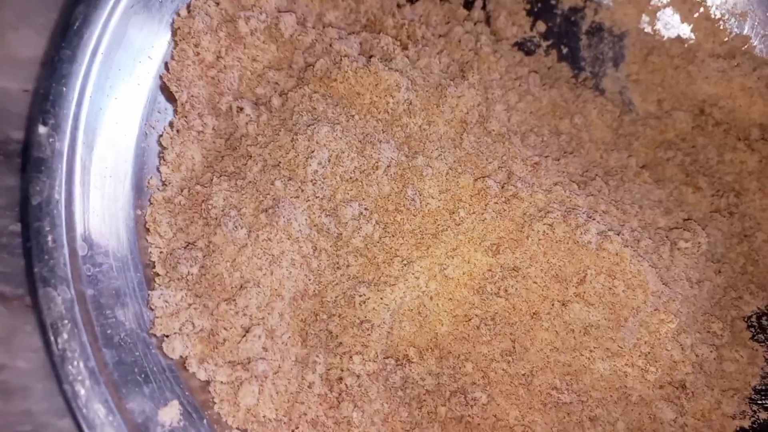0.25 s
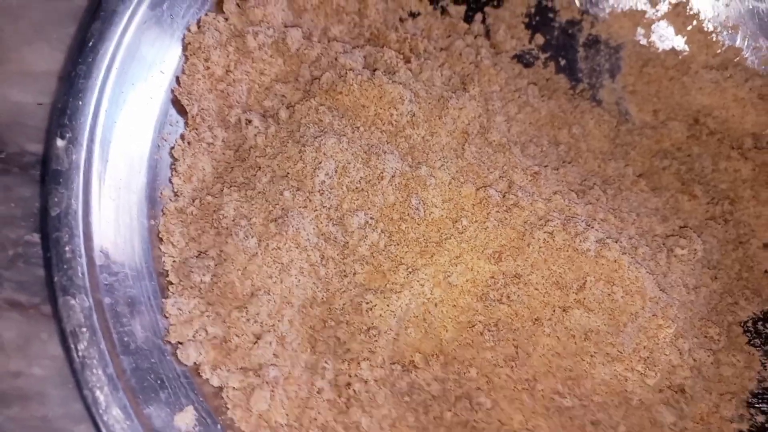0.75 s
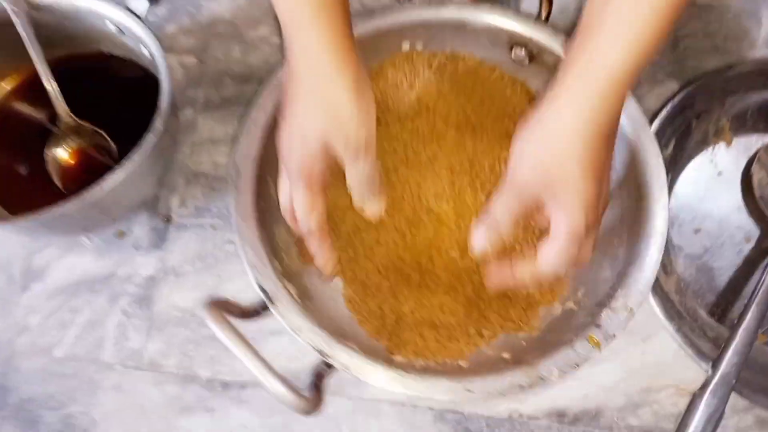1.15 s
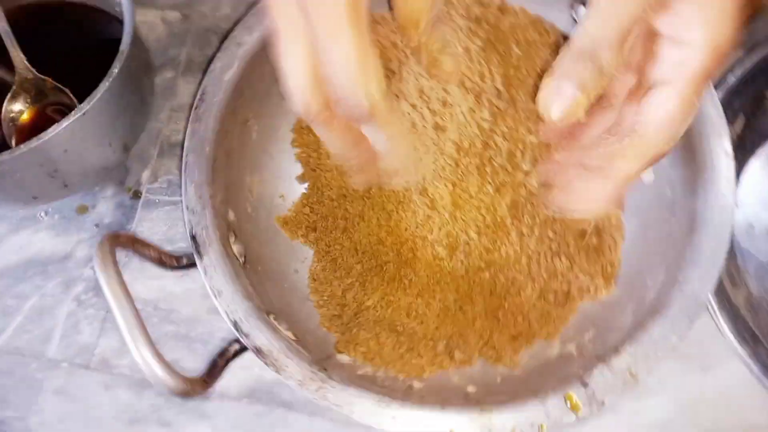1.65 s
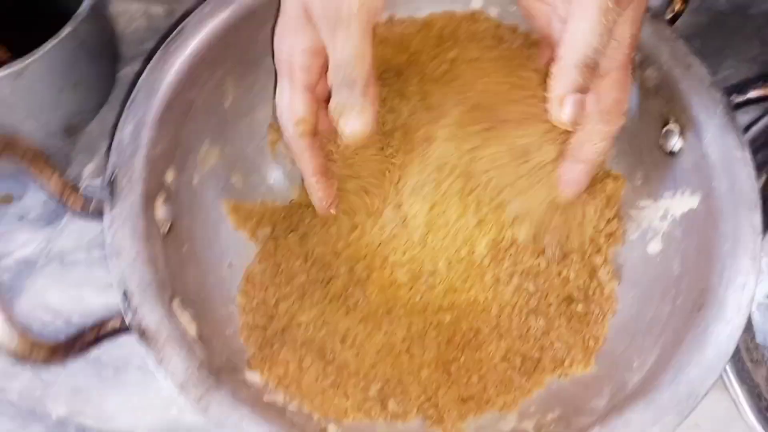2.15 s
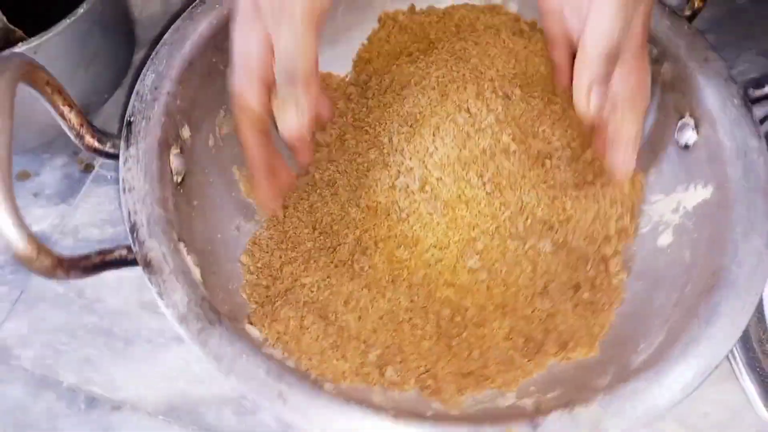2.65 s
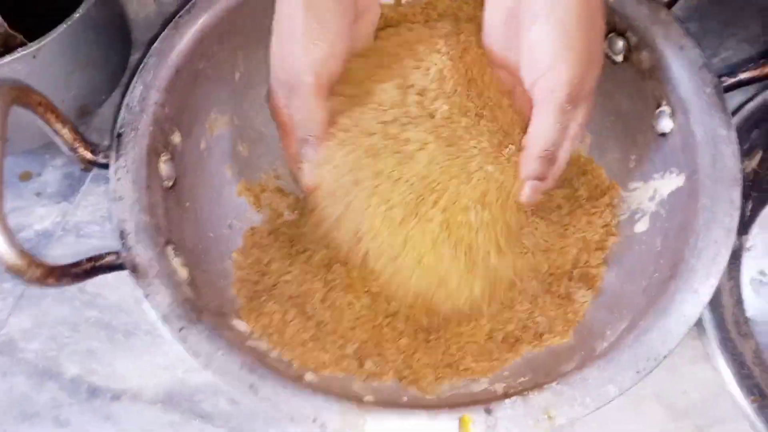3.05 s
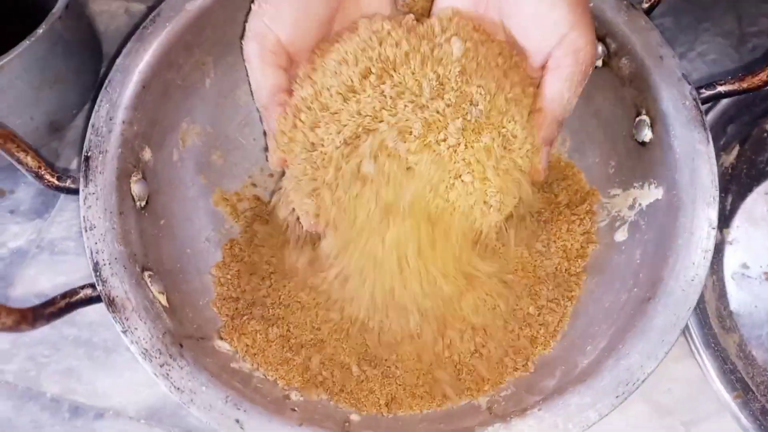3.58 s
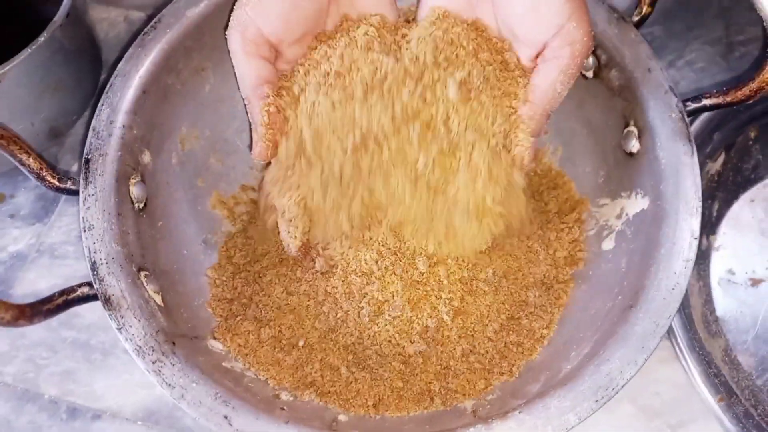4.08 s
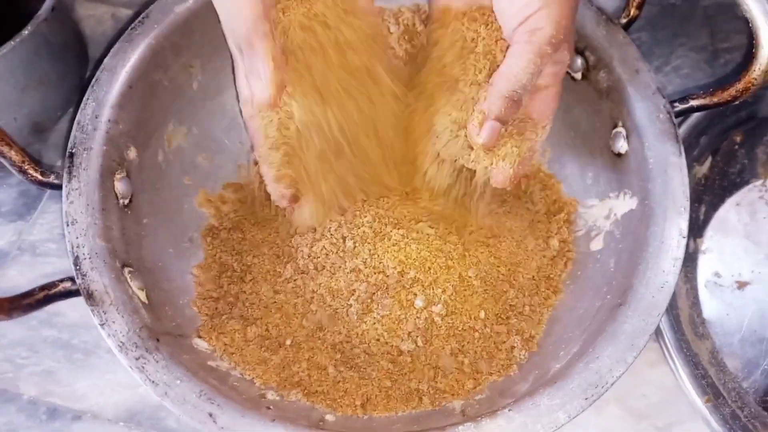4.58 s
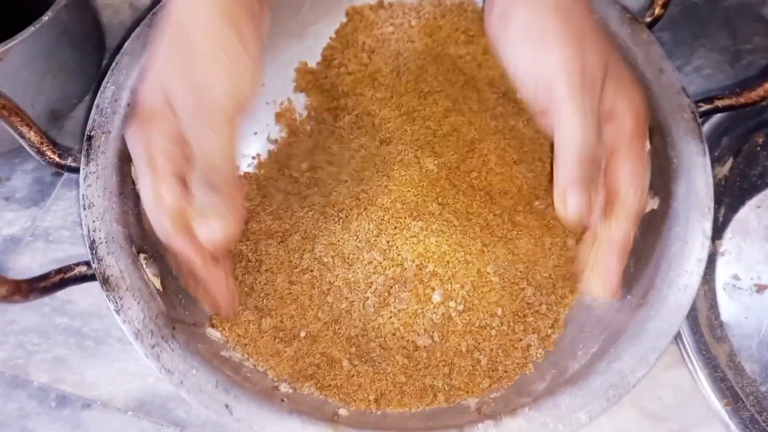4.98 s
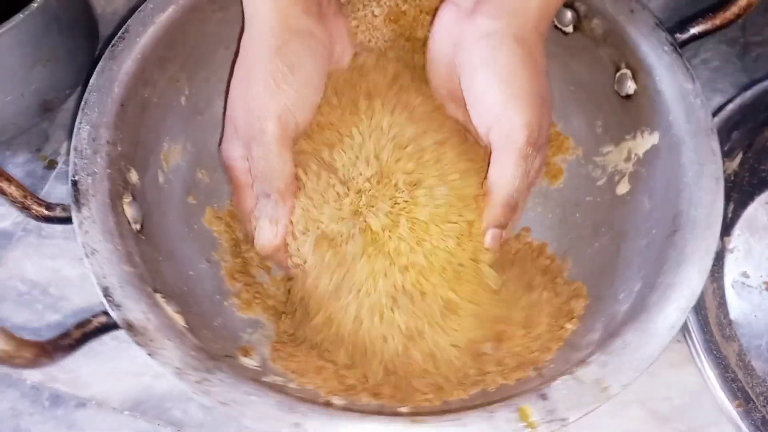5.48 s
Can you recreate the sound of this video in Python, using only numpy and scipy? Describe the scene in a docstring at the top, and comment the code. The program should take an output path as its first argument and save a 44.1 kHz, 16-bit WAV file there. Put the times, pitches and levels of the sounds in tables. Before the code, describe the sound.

Close-up of hands working crumbly flour in a steel pan in a quiet kitchen. Dull low thuds cluster in the first second, fade to near silence, then return with a powdery sweep. A hard metallic knock rings briefly around two seconds, followed by uneven soft thumps, rustling crumbs, small crunches and a tiny squeak near the end.

```python
"""Hands in a flour mixture

Two hands scoop, rub and sift a crumbly flour mixture in a steel pan, close by in a quiet kitchen.
Palms and clumps thud as sinking sine swings on the pan bottom, which rubbing keeps humming.
Crumbs rustle as coloured grains, lumps crunch as noise bursts, and sweeps hiss along the metal.
The pan knocks twice as ringing modes and a fingertip squeaks; the sound drops out for two short moments."""
import sys
import numpy as np
from scipy import signal
from scipy.fft import rfft, irfft
from scipy.io import wavfile
from scipy.ndimage import uniform_filter1d

SR = 44100
rng = np.random.default_rng(int(sys.argv[2]) if len(sys.argv) > 2 else 0)


def generate_wav(sig):
    """Save sig (samples, or channels by samples) to the path in sys.argv[1] as 16-bit PCM at SR."""
    pcm = np.round(np.clip(np.atleast_2d(sig).T, -1, 1) * 32767).astype(np.int16)
    wavfile.write(sys.argv[1], SR, pcm)


N = 252516
TIME = np.arange(N) / SR


def undb(db):
    """Decibels to gain."""
    return 10 ** (np.asarray(db) / 20)


def unit(x):
    """Scale to rms 1."""
    return x / np.sqrt(np.mean(x ** 2))


def noise():
    """White noise over the whole scene."""
    return rng.standard_normal(N)


def add(track, s, sound):
    """Mix a sound in, starting at s seconds; what lies outside the scene is cut off."""
    start = int(s * SR)
    part = sound[max(-start, 0):N - start]
    first = max(start, 0)
    track[first:first + len(part)] += part


def curve(points):
    """A control that runs in straight lines through (time [s], value) points."""
    return np.interp(TIME, *np.transpose(points))


def walk(rate):
    """Random control with straight lines between normal values, rate of them per second."""
    knots = rng.standard_normal(4096)
    return np.interp(TIME * rate, np.arange(len(knots)), knots)


def resonate(x, hz, width_hz):
    """Two-pole resonance, gain 1 at the centre."""
    hz = min(hz, .4 * SR)
    b, a = signal.iirpeak(hz, hz / min(width_hz, SR / 4), fs=SR)
    return signal.lfilter(b, a, x)


def band(x, hz, width_hz):
    """A resonance applied twice: steep sides."""
    return resonate(resonate(x, hz, width_hz), hz, width_hz)


def colour(x, points):
    """Shape a spectrum by (frequency [Hz], level [dB]) points, falling 10 dB/octave outside, at rms 1."""
    hz, db = np.transpose(points)
    bins = np.maximum(np.fft.rfftfreq(N, 1 / SR), 1)
    octaves_below = np.maximum(np.log2(hz[0] / bins), 0)
    octaves_above = np.maximum(np.log2(bins / hz[-1]), 0)
    shape_db = np.interp(np.log(bins), np.log(hz), db) - 10 * (octaves_below + octaves_above)
    return unit(irfft(rfft(x) * undb(shape_db), N))


def grains(per_s, spread_db):
    """Random tiny impacts, most faint and a few strong, at rms 1."""
    sizes = undb(spread_db * np.minimum(rng.exponential(size=N), 5))
    hits = rng.random(N) < per_s / SR
    return unit(hits * sizes * rng.choice([-1, 1], N))


# Hand pressure on the pan bottom, which guides the rubbing and the small clumps:
# (time [s], reference level [dB])
PRESSURE = [(0, -47.5), (.24, -54), (.4, -61.5), (.75, -64.5), (1.0, -74), (1.48, -69), (1.7, -60.5),
            (2.02, -60.5), (2.12, -52.5), (2.4, -56.5), (2.96, -58), (3.1, -58.5), (3.55, -57.5),
            (3.85, -56), (4.85, -60.5), (5.1, -51), (5.55, -57), (5.73, -63.5)]


def small_clumps(per_s=17, above_pressure_db=8, spread_db=3, clump_hz=222, spread_octaves=0.173,
                 length_s=.011, crackle_db=-19):
    """Small clumps drop at uneven intervals, harder as the hands press harder; rows as in THUDS."""
    chance = rng.standard_normal((256, 3))
    times = (np.arange(len(chance)) + .5 * chance[:, 0]) / per_s
    pressure_db = np.interp(times, *np.transpose(PRESSURE))
    db = pressure_db + above_pressure_db + spread_db * np.clip(chance[:, 1], -2, 1)
    hz = clump_hz * 2 ** (spread_octaves * chance[:, 2])
    return [(s, level, pitch, length_s, crackle_db)
            for s, level, pitch in zip(times, db, hz) if 0 < s < TIME[-1]]


# Palms and big clumps on the pan bottom; length and crackle are scaled further in thuds():
# (peak time [s], swing envelope peak [dB], pitch at the peak [Hz], nominal length [s], nominal crackle [dB])
THUDS = [(0.007, -34.5, 228, 0.015, -16), (.05, -43, 209.5, 0.025, -27), (.098, -37.5, 199, 0.0057, -15),
         (0.195, -55, 214.4, 0.051, -39), (0.251, -39.5, 243.5, .005, -14), (.343, -44, 202, 0.0053, -26),
         (0.396, -48, 228, .015, -39), (.436, -46.5, 205, 0.011, -26), (.491, -30, 228, .012, -50),
         (0.534, -39.5, 192, 0.0082, -48), (0.604, -44, 190.7, 0.0097, -41),
         (0.726, -46.5, 260, 0.018, -33), (0.899, -50, 323.6, 0.0099, -3.5),
         (1.705, -41.5, 144.6, 0.015, -36), (1.785, -50, 217.3, .012, -6.5),
         (2.094, -43.5, 142.3, 0.013, 0), (2.154, -39.5, 210.4, 0.0086, -5),
         (2.337, -39, 219, 0.0032, -6.5), (2.528, -49.5, 188.5, 0.048, -5.5), (2.626, -24, 452, 0.002, -19),
         (2.766, -35.5, 170, 0.0048, -28), (2.814, -39, 131, 0.0096, -22), (2.836, -38, 145, 0.0066, -23),
         (2.89, -40.5, 310, 0.0099, -26), (2.939, -38.5, 278, .012, -28),
         (3.042, -41.5, 255.3, 0.0076, -13), (3.202, -41, 232, 0.005, -29), (3.31, -28, 193.4, 0.007, -21),
         (3.511, -32.5, 172.7, 0.016, -28), (3.558, -25, 180, 0.02, -26.5),
         (3.592, -25.5, 197, 0.0088, -20), (3.761, -48.5, 213.7, 0.011, -7),
         (3.934, -41, 227.6, 0.031, -21.5), (4.053, -39, 202.4, 0.0065, -14),
         (4.177, -41, 157.5, .014, -12.5), (4.244, -36.5, 280.4, 0.0061, -18),
         (4.349, -38.5, 306, 0.011, -18), (4.461, -45.5, 210.4, 0.015, -18), (4.573, -40, 227, 0.018, -22),
         (4.608, -40.5, 177.3, 0.0088, -17), (4.711, -31.5, 200, .007, -42),
         (4.748, -38.5, 226, 0.0067, -21), (4.77, -42, 189.3, 0.0078, -15),
         (4.953, -37.5, 235, 0.0087, -18), (5.0, -37.5, 244.8, 0.0089, -12.5),
         (5.025, -44.5, 347, 0.0057, -13), (5.174, -27.5, 180.1, 0.0092, -46),
         (5.261, -43.5, 147, 0.013, -13), (5.344, -43.5, 207.5, 0.0051, -23),
         (5.467, -38, 201, 0.0055, -39), (5.529, -33.5, 272, 0.0052, -4.5),
         (5.55, -35.5, 221.5, 0.014, -18)]
# Spectrum of the crumbs, heard in the thuds' grit and in the rustle: (frequency [Hz], relative level [dB])
CRUMB_COLOUR = [(500, -3), (750, 6), (1000, -4.5), (1200, 2), (1420, 2.5), (1900, 3), (2400, 0.5),
                (2850, -0.5), (3400, -3), (4800, -11.5), (6000, -37), (8000, -31), (12000, -17)]


def thuds(rise=0.61, fall=0.5, sag=0.065, smear_db=-13, overtone_db=-4, grit_db=-31):
    """Soft pushes swing the bottom for a few cycles; the flour smothers it and crackles under the push."""
    swing, blur_level, overtone_level, grit_level = np.zeros((4, N))
    t = np.arange(-SR // 20, SR // 8) / SR  # zero at the peak
    # a clump lands in many pieces, which blurs the pitch
    blur = unit(band(noise(), 267, 260))
    overtones = unit(band(noise(), 680, 560))
    grit = colour(grains(6000, 2.4), CRUMB_COLOUR)
    turns = rng.random(512)  # starting phases, in cycles
    for (s, db, hz, length, crackle_db), turn in zip(THUDS + small_clumps(), turns):
        side_s = length * np.where(t < 0, rise, fall)
        envelope = undb(db) * np.exp(-np.abs(t / side_s) ** 1.35)
        # the pitch sinks as the weight settles on the metal
        cycles = np.cumsum(hz * (1 - sag * np.tanh(t / length))) / SR
        start = s + t[0]
        add(swing, start, envelope * np.sin(2 * np.pi * (cycles + turn)))
        add(blur_level, start, envelope * undb(crackle_db / 4))
        add(overtone_level, start, envelope * undb(crackle_db))
        add(grit_level, start, envelope * undb(crackle_db / 2))
    smear = undb(smear_db) * blur_level * blur
    rough = undb(overtone_db) * overtone_level * overtones
    return swing + smear + rough + undb(grit_db) * grit_level * grit


# Resonances of the loaded pan bottom: (frequency [Hz], width [Hz], relative gain [dB])
BOTTOM_MODES = [(70.5, 11, -14), (199.6, 22, 2), (374.5, 39, 10), (453, 63, 2.5), (543.7, 10, 10.5),
                (740, 32, -4.5), (854, 35, -16.5)]


def bottom_ring(push):
    """The loaded bottom answers a push with its own damped resonances."""
    return sum(undb(db) * resonate(push, hz, width) for hz, width, db in BOTTOM_MODES)


# Spectrum of the rubbing on the bottom: (frequency [Hz], relative level [dB])
RUB_COLOUR = [(130, 3.5), (175, -4.5), (204, 7), (240, -2), (310, -1), (400, -20.5), (469, 2.5),
              (540, -14.5), (640, -28), (740, -6.5), (860, -23.5), (960, -7.5), (1300, -41.5)]
# Spectrum of the whole pan's rumble: (frequency [Hz], relative level [dB])
RUMBLE_COLOUR = [(22, -12), (35, -15.5), (52, -10), (70, 1.5), (90, -12), (120, 0.5), (160, -6.5)]
# The hands shove the whole pan, which rumbles: (peak time [s], length to 1/e each side [s], level [dB])
SHOVES = [(0.084, 0.011, -43.5), (1.958, 0.017, -46.5), (2.094, 0.016, -45), (2.539, 0.032, -50.5),
          (2.788, 0.069, -48.5), (3.536, 0.082, -51), (5.167, 0.011, -53)]


def rubbing(rub_db=-6, sing_db=-7, spill_db=4.7, rumble_db=-8):
    """Pressing hands rub the bottom and keep it humming; the pan rumbles under them, most when shoved."""
    pressure_db = curve(PRESSURE)
    rub_level = undb(pressure_db + rub_db + spill_db * walk(54))
    rub = colour(grains(1000, 2.4), RUB_COLOUR) * rub_level
    hum = unit(bottom_ring(colour(noise(), RUB_COLOUR))) * undb(pressure_db + sing_db)
    shoves = sum(undb(db) * np.exp(-np.abs(TIME - s) / length) for s, length, db in SHOVES)
    rumble = colour(noise(), RUMBLE_COLOUR) * (undb(pressure_db + rumble_db) + shoves)
    return rub + hum + rumble


# Flow of crumbs through the fingers, which guides their rustle: (time [s], reference level [dB])
FLOW = [(0, -63.5), (.24, -68.5), (.42, -79.5), (1.0, -83.5), (1.51, -81.5), (1.55, -65), (1.8, -76.5),
        (2.12, -62), (2.4, -71), (2.85, -65.5), (3.1, -69), (3.3, -70.5), (3.57, -67.5), (3.95, -69.5),
        (4.84, -71), (5.0, -66.5), (5.4, -66), (5.73, -81.5)]
# Spectrum of the fine powder, heard in the rustle and the sweeps: (frequency [Hz], relative level [dB])
POWDER_COLOUR = [(2500, -11.5), (4500, -0.5), (6500, -6.5), (8500, -9), (11200, -5.5), (13500, -10),
                 (16000, -7.5)]


def rustle(crumb_db=-1, spill_db=1.7, dust_db=-47, dust_growth=0.44):
    """Crumbs tick in little spills and carry some hissing powder with them."""
    flow_db = curve(FLOW)
    spills = undb(spill_db * walk(80))
    crumbs = colour(grains(2500, 2.5), CRUMB_COLOUR) * undb(flow_db + crumb_db)
    # the dust grows less steeply than the crumbs
    dust = colour(grains(8000, 2.5), POWDER_COLOUR) * undb(dust_db + dust_growth * flow_db)
    return (crumbs + dust) * spills


# Lumps crushed or dropped against the steel:
# (onset [s], burst peak [dB], centre [Hz], width of each filter pass [Hz], twice the envelope's rise [s])
CRUNCHES = [(.005, -41, 1060, 1100, 0.011), (0.071, -44.5, 1480, 1560, 0.015),
            (0.122, -45.5, 905, 398, 0.011), (0.235, -46, 2400, 1340, 0.015),
            (0.715, -50, 575, 400, 0.0048), (0.75, -49, 470, 270, 0.0062),
            (.888, -41.5, 3280, 5900, 0.0059), (.89, -39.5, 454, 267, .011), (1.244, -61, 740, 447, 0.011),
            (1.245, -59.5, 3140, 3000, .005), (1.868, -44, 810, 500, 0.019), (1.92, -52, 1200, 700, .007),
            (1.885, -45.5, 3100, 2870, .006), (2.063, -40.5, 3860, 4630, 0.015),
            (2.14, -51, 2720, 600, 0.033), (2.144, -42, 440, 198, 0.016), (2.324, -54.5, 1160, 3000, 0.015),
            (2.489, -48.5, 5540, 3550, .009), (2.611, -31, 570, 165, 0.02), (2.719, -43, 2970, 2260, .012),
            (2.791, -47.5, 3000, 1710, .045), (2.925, -46.5, 590, 150, 0.03), (2.976, -39, 536, 260, 0.014),
            (3.304, -35.5, 296, 226, 0.018), (3.44, -50.5, 1480, 500, 0.0057),
            (3.475, -48.5, 1030, 500, 0.012), (3.521, -46.5, 347, 160, 0.047),
            (3.554, -47.5, 1570, 2120, 0.034), (3.753, -48.5, 1100, 1320, 0.0082),
            (3.8, -54, 1030, 500, .03), (4.235, -50.5, 640, 497, 0.034), (4.585, -56, 1420, 686, 0.0095),
            (4.786, -45.5, 457, 300, 0.0054), (4.909, -53.5, 1190, 1700, 0.065),
            (4.91, -37, 505, 238, 0.027), (5.124, -47, 1010, 600, 0.0066), (5.163, -35, 378, 255, .014),
            (5.416, -48.5, 494, 600, 0.028), (5.525, -42, 4430, 11000, 0.0011),
            (5.528, -47, 1150, 1440, 0.0098)]


def crunches(tail_db=-22, tail_s=0.022):
    """A lump gives way in a short burst of uneven fractures, then its bits settle."""
    out, t = np.zeros(N), np.arange(SR // 5) / SR
    for s, db, hz, width, length in CRUNCHES:
        age = 2 * t / length
        envelope = age * np.exp(1 - age) + undb(tail_db) * np.exp(-t / tail_s)
        strength, fractures = rng.standard_normal((2, len(t)))
        uneven = fractures * np.exp(np.minimum(strength, 2))
        burst = band(envelope * uneven, hz, width)
        add(out, s, undb(db) * burst / np.abs(burst).max())
    return out


# Fingers sweep through the powder along the bare steel; both levels come before flicker and trims:
# (peak time [s], swell [s], fade [s], hiss level [dB], swish centre [Hz], swish level [dB])
SWEEPS = [(1.555, 0.011, 0.064, -70, 3080, -62), (2.011, .035, 0.079, -73, 7450, -66.5),
          (2.5, 0.013, 0.098, -70, 5030, -83), (2.72, 0.12, 0.067, -68.5, 3100, -70.5),
          (2.82, 0.048, 0.15, -70.5, 2730, -60.5), (4.99, 0.2, 0.12, -72.5, 11200, -77.5),
          (5.2, 0.12, 0.18, -68.5, 2800, -68)]


def sweeps(swish_db=-1, swish_width=0.96, flicker_db=3.65, tick_db=-9):
    """Powder hisses along the steel, each sweep with its own swish, following the finger's speed."""
    hiss = colour(grains(14000, 2.4), POWDER_COLOUR)
    # now and then a hard grain strikes bare steel
    hiss = hiss + undb(tick_db) * colour(grains(90, 2.8), POWDER_COLOUR)
    sliding = grains(7000, 2.4)
    out = np.zeros(N)
    for s, swell, fade, hiss_db, hz, db in SWEEPS:
        speed = np.exp(-((TIME - s) / np.where(TIME < s, swell, fade)) ** 2)
        swish = unit(band(sliding, hz, min(swish_width * hz, 3000)))
        out += speed * (undb(hiss_db) * hiss + undb(db + swish_db) * swish)
    return out * undb(flicker_db * walk(60))


# Hard contacts of the pan: (onset [s], peak [dB], ring time relative to the modes [ratio])
KNOCKS = [(1.959, -37, 0.84), (2.047, -44.5, 0.82), (2.0592, -39.5, 0.9), (2.0672, -28, 0.27),
          (2.0719, -15, 1.0)]
# What the pan wall rings with, before the blow's band shapes it:
# (frequency [Hz], relative level [dB], time to fall 60 dB at ring ratio 1 [s])
WALL_MODES = [(603, -11.5, 0.068), (996, -9.5, 0.078), (1263, 5.5, 0.022), (1458, -3, 0.039),
              (1680, 3.5, 0.018), (2034, -12.5, 0.12), (1985, -16, 0.053), (2250, -35, 0.019),
              (2820, -43, 0.25), (2887, -40, 0.46)]


def knocks(contact_s=0.0012, blow_hz=1400, blow_width_hz=2200):
    """Cushioned contacts ring the wall; the hands choke its modes below 2600 Hz after about 20 ms."""
    out, t = np.zeros(N), np.arange(SR // 2) / SR
    choke = undb(np.interp(t, [.019, .025], [0, -20]))
    cushion = 1 - np.exp(-t / contact_s)
    for s, db, ring in KNOCKS:
        sound = np.zeros(len(t))
        for hz, mode_db, t60 in WALL_MODES:
            mode = undb(mode_db - 60 * t / (t60 * ring)) * np.sin(2 * np.pi * hz * t)
            sound += mode * choke if hz < 2600 else mode
        sound = band(sound * cushion, blow_hz, blow_width_hz)
        add(out, s, undb(db) * sound / np.abs(sound).max())
    return out


# A fingertip on the steel, before jitter and grip: (time [s], centre pitch [Hz], reference level [dB])
SQUEAK = [(4.89, 500, -60), (4.911, 520, -52), (4.917, 530, -39), (4.927, 545, -43), (4.933, 540, -40),
          (4.94, 550, -43), (4.95, 535, -39), (4.965, 550, -49), (5.01, 520, -58)]


def squeak(jitter=0.044, octave_db=-24, grip_db=-3, slip_db=3):
    """Floury skin sticks and slips unevenly on steel: a jittery tone with a faint octave."""
    s, hz, db = np.transpose(SQUEAK)
    pitch = np.interp(TIME, s, hz) * (1 + jitter * walk(200))
    phase = 2 * np.pi * np.cumsum(pitch) / SR
    grip = undb(grip_db + slip_db * walk(220))
    level = undb(np.interp(TIME, s, db, left=-200, right=-200))
    tone = np.sqrt(2) * (np.sin(phase) + undb(octave_db) * np.sin(2 * phase))
    return grip * level * tone


# Spectrum of the quiet kitchen: (frequency [Hz], relative level [dB])
ROOM_COLOUR = [(25, 6.5), (70, 0.5), (130, 9.5), (204, -7), (330, -6), (469, -10.5), (700, -26),
               (1100, -29), (4000, -29), (15500, -44)]


def kitchen_hush(level_db=-74):
    """The kitchen's faint hush is steady noise, strongest in the bass."""
    return colour(noise(), ROOM_COLOUR) * undb(level_db)


def scene(ring_db=-6):
    """All the hand sounds, close by, over the kitchen's faint hush."""
    pushes = thuds()
    pan_bottom = pushes + undb(ring_db) * bottom_ring(pushes) + rubbing()
    flour = rustle() + crunches() + sweeps()
    steel = knocks() + squeak()
    return (pan_bottom + flour + steel + kitchen_hush())[None]


# Moments when the sound drops out: (start [s], end [s])
GAPS = [(.836, .868), (5.505, 5.526)]


def record(dry, top_hz=15750):
    """The sound drops out twice with short ramps, and a steep low-pass cuts the top."""
    live = np.ones(N)
    for start, end in GAPS:
        live[(TIME > start) & (TIME < end)] = 0
    gated = dry * uniform_filter1d(live, size=64)
    low_pass = signal.ellip(10, .2, 70, top_hz, fs=SR, output="sos")
    return signal.sosfilt(low_pass, gated)


dry = scene()
out = record(dry)
generate_wav(out)
```